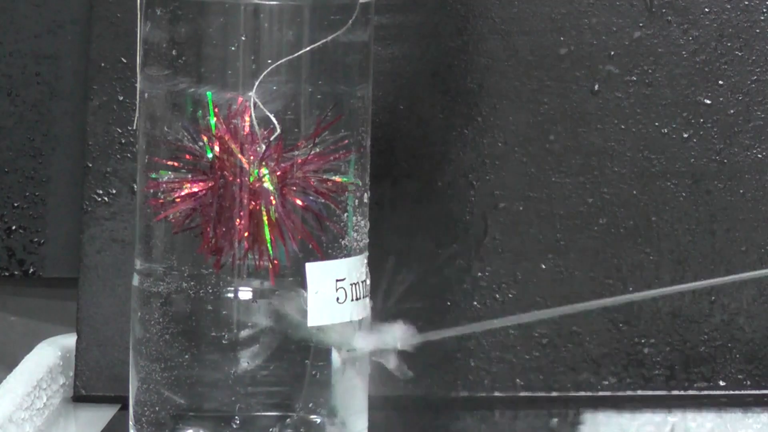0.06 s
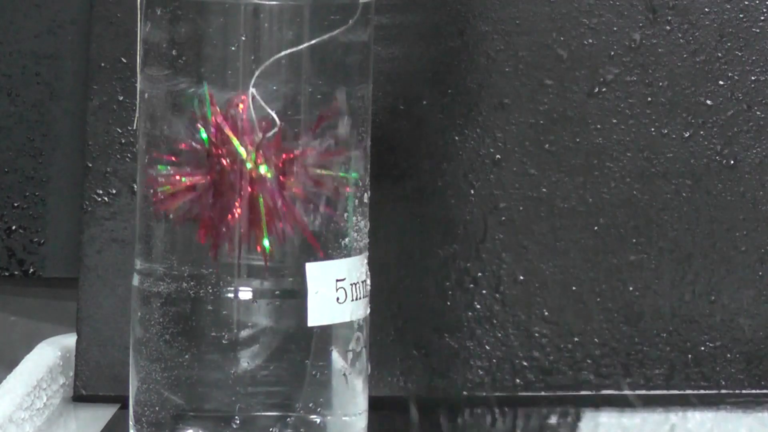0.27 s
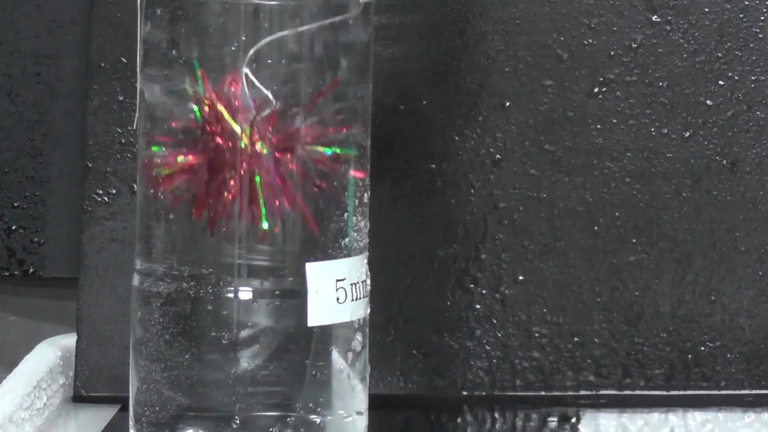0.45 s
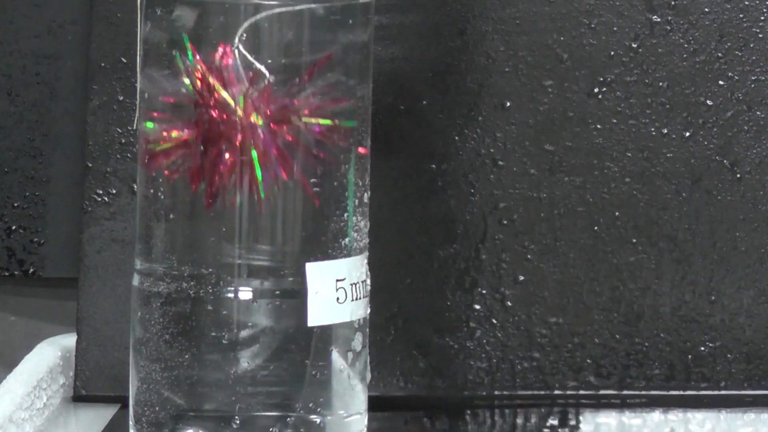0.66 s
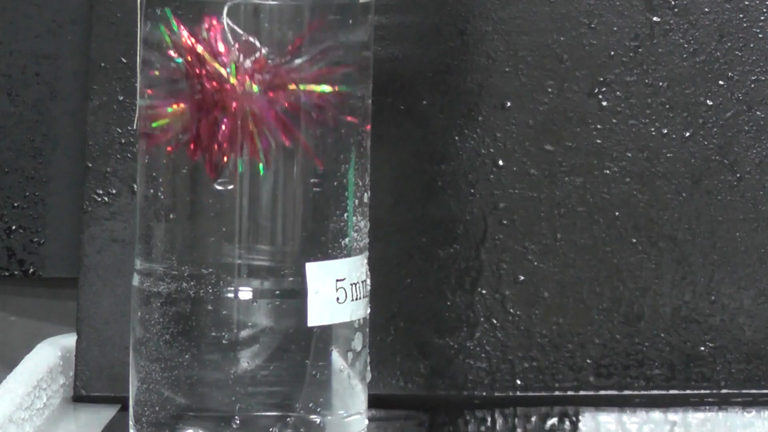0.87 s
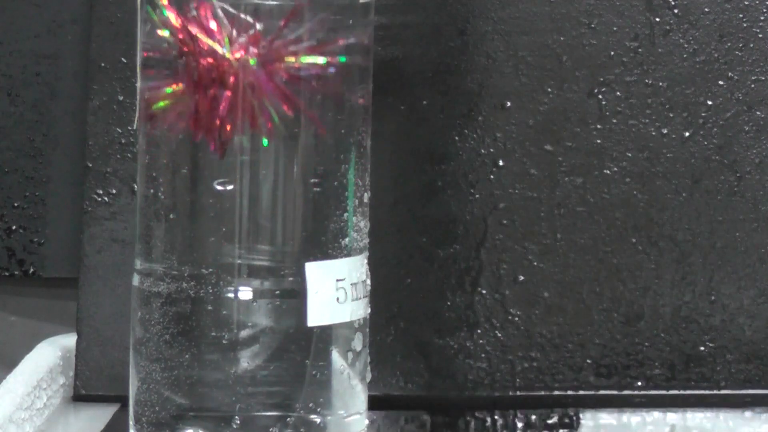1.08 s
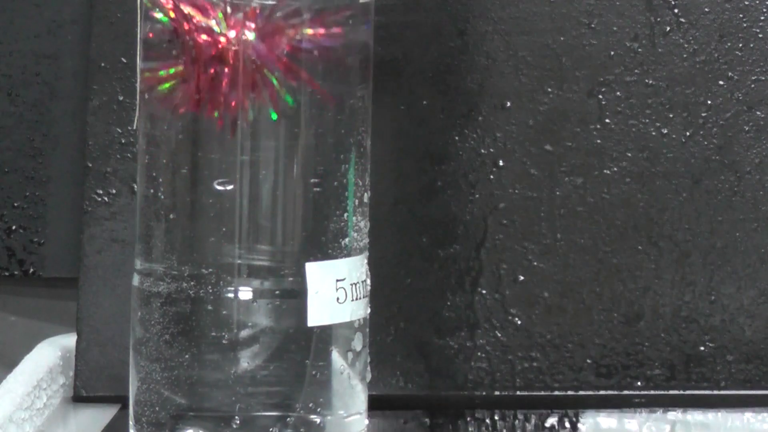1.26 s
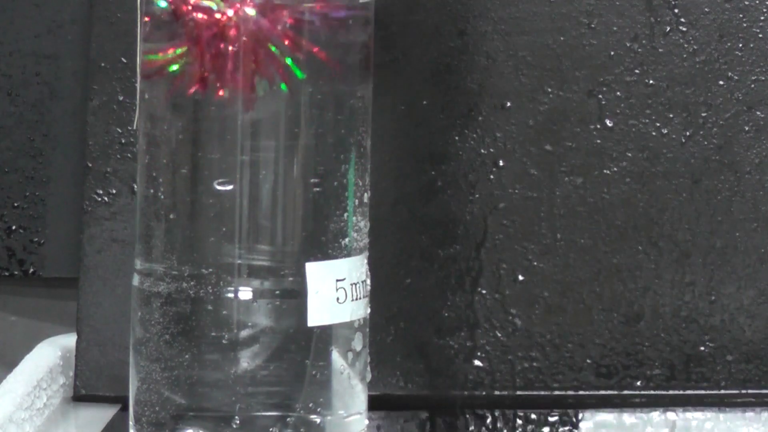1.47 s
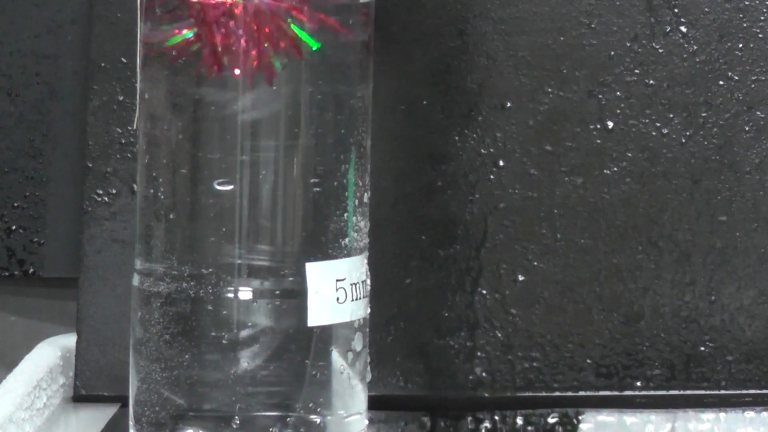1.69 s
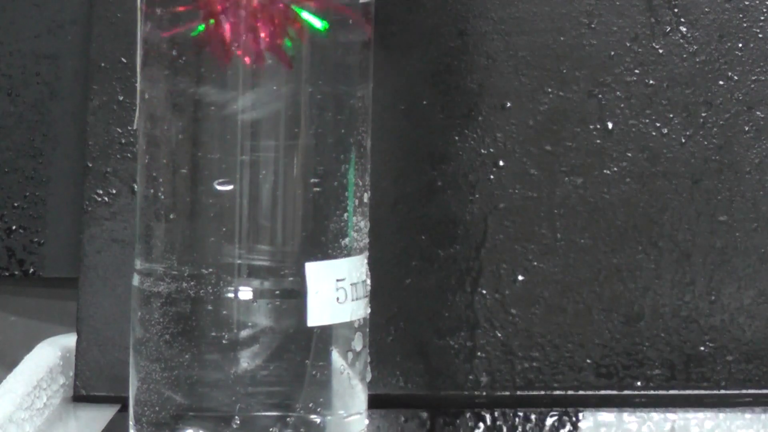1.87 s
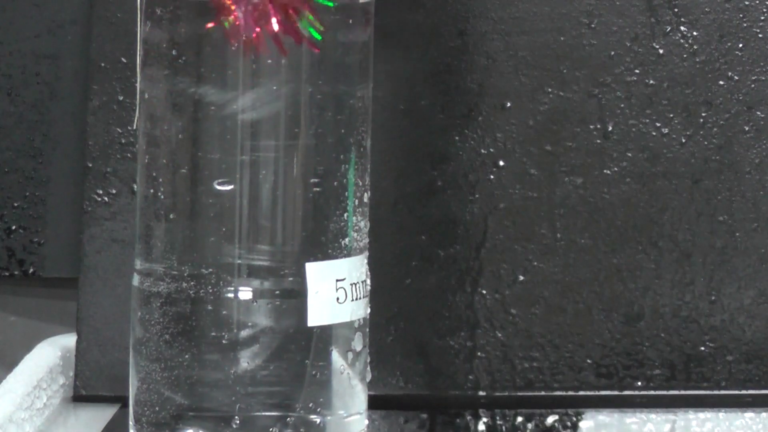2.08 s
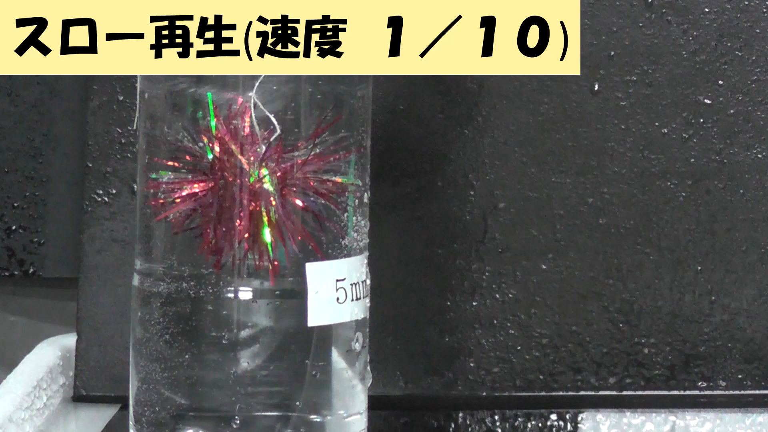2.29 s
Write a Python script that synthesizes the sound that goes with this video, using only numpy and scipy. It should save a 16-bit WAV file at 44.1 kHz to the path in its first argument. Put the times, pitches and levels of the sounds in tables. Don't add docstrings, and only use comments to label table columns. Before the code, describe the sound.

Bright, dense spray splatters on a plastic bottle with two dull wall thumps, fading within a third of a second. Afterwards only fan hum, thin whine, quick ticking, distant insect chirps and faint rustles remain, until an abrupt cut.

```python
import sys
import numpy as np
from scipy import signal
from scipy.io import wavfile

SR = 44100
rng = np.random.default_rng(int(sys.argv[2]) if len(sys.argv) > 2 else 0)


def gain_from_db(level_db):
    decades = np.asarray(level_db, float) / 20
    return 10 ** decades


def unload_audio(sound):
    columns = np.transpose(np.atleast_2d(sound))
    steps = np.round(np.clip(columns, -1, 1) * 32767)
    wavfile.write(sys.argv[1], SR, steps.astype(np.int16))


N = 103061

# f/Hz, density/dB per Hz
HUM_SPECTRUM = [(15, -52.5), (25, -16), (64, -17), (98, -9.5), (124, -13), (287, 0.5), (323, -10),
                (396, -6.5), (1400, -19.5), (1820, -55), (3080, -120)]
# f/Hz, density/dB per Hz
AIR_SPECTRUM = [(820, -32), (1400, 4.5), (2720, -10), (2950, -9), (4680, -14.5), (5670, -8.5), (7590, -14),
                (9560, -11), (15500, -16)]
# f/Hz, left-right likeness/1
BACKGROUND_ALIKE = [(60, 0.92), (180, 1), (550, 0.89), (1650, 0.92), (4970, 0.83), (15000, -0.56)]
# f/Hz, left minus right level/dB
BACKGROUND_PAN = [(60, -2.5), (240, -1.0), (950, 1), (3770, -0.5), (15000, 0.5)]
# f/Hz, width/Hz, level/dB
DRONES = [(98.5, 8.0, -54), (155, 25, -54), (199, 8.0, -53), (297, 16, -46.5), (398.6, 14, -48),
          (540, 12, -55)]
# f/Hz, level/dB, pan/dB
WHINES = [(1227.5, -63, -.5), (2062, -70, -.5), (2848, -63, -.5), (3829.5, -64.5, -.5), (4420, -74, -.5),
          (4468, -75, -.5), (5460, -73, -2)]
# t/s, level/dB, brightness/dB per octave
JET = [
    (.022, -27, 1.5),
    (.05, -27, -1.2),
    (.12, -24, 0.63),
    (.2, -26.5, -1.5),
    (.225, -33, -2.5),
    (.29, -46.5, -2.5),
    (.34, -57.5, -7),
    (.43, -74, -8),
]
# f/Hz, density/dB per Hz
SPLASH_SPECTRUM = [(820, -31), (1400, -10), (1530, 13), (1730, -9), (4500, -8), (5500, -3), (7820, -5.5),
                   (11600, -2), (15500, -17)]
# f/Hz, left-right likeness/1
SPLASH_ALIKE = [(200, 0.85), (1650, .85), (4000, 1), (6000, 0.87), (8500, .35), (10500, .3), (12500, 0.55),
                (15000, .3)]
# f/Hz, left minus right level/dB
SPLASH_PAN = [(240, -1.0), (950, 4), (3770, -1.2), (8000, 1), (10500, .3), (12500, -2.5), (15000, -5.5)]
# f/Hz, width/Hz, gain/dB
SIZZLES = [(8800, 420, 3), (11800, 1200, 3), (5020, 190, 2), (6300, 900, 2.5)]
# t/s, rattle level/dB, boom level/dB
PUSH = [
    (.02, -42, -55),
    (.05, -26.5, -33.5),
    (.09, -32.5, -29.5),
    (.113, -33, -43),
    (.132, -27.5, -29.5),
    (.178, -28, -26),
    (.2, -32, -53.5),
    (.24, -32.5, -41.5),
    (.34, -50.5, -55),
]
SURGES = (.045, .125)
# f/Hz, width/Hz, level/dB
WALL = [(501.4, 40, -3.5), (738, 65, -4), (970, 46, -1), (1244, 71, -1.5)]
# t/s, length/s, level/dB
CHIRPS = [(.472, .085, -65), (.592, .067, -66), (.695, 0.064, -64), (.783, .037, -63), (.875, 0.13, -66),
          (1.018, .09, -67), (1.14, .04, -68), (1.293, .026, -63), (1.327, .035, -64), (1.37, .045, -65),
          (1.48, 0.045, -69), (1.77, 0.058, -61), (1.84, 0.077, -64.5), (2.03, .17, -66),
          (2.21, .04, -62.5)]
# t/s, length/s, level/dB
TRILLS = [
    (1.517, .145, -61),
    (1.906, .072, -60.5),
]
# f/Hz, level/dB, t60/s
HOUSING = [(1744, 0.3, 0.028), (1970, -9, .02), (2135, -8.5, 0.03), (2384, -3, 0.027), (2990, -20, 0.011),
           (5000, -12.5, 0.015), (6330, -10.5, 0.013), (6620, -12, 0.011)]
# t/s, decay/s, level/dB, low f/Hz, high f/Hz
RUSTLES = [
    (1.125, 0.075, -52.5, 2950, 11600),
    (2.14, 0.061, -48.5, 1490, 6760),
]
# f/Hz, width/Hz, gain/dB
NOTCHES = [(7740, 630, -12), (4490, 270, -4), (1390, 380, -6)]

WAVER_DB = 1.6


def rms_one(x):
    return x / np.sqrt(np.mean(x ** 2) + 1e-20)


def at_hz(points, hz):
    points = np.array(points)
    return np.interp(np.log(hz), np.log(points[:, 0]), points[:, 1])


def in_time(rows, n):
    s, *columns = np.transpose(rows)
    return [np.interp(np.arange(n) / SR, s, c) for c in columns]


def drift(rate):
    r = np.exp(-80 * np.pi * rate / SR)
    slow = signal.lfilter([1], [1, -2 * r, r * r], rng.standard_normal(N // 40 + 2002))[2000:]
    return np.interp(np.arange(N) / 40, np.arange(len(slow)), rms_one(slow))


def tone(hz, wander_hz, rate):
    return np.sqrt(2) * np.sin(2 * np.pi * np.cumsum(hz + wander_hz * drift(rate)) / SR)


def band_pass(x, order, low_hz, high_hz):
    return signal.sosfilt(signal.butter(order, [low_hz, high_hz], "band", fs=SR, output="sos"), x)


def resonance(x, hz, width_hz):
    r = np.exp(-np.pi * width_hz / SR)
    top = np.array([1, 0, -1]) * (1 - r * r) / 2
    return signal.lfilter(top, [1, -2 * r * np.cos(2 * np.pi * hz / SR), r * r], x)


def steep_resonance(x, hz, width_hz):
    return resonance(resonance(x, hz, width_hz), hz, width_hz)


def panned(x, db):
    return x * gain_from_db(np.array([[db / 2], [-db / 2]]))


def gate(start, length, edge):
    t = np.arange(N) / SR
    return np.clip(np.minimum(t - start, start + length - t) / edge, 0, 1)


def grains(rate, spread_db, size):
    big = gain_from_db(spread_db * np.minimum(rng.exponential(1, size), 5)) * rng.choice([-1, 1], size)
    return rms_one(big * (rng.random(size) < rate / SR))


def banded(white, spectrum, span, alikes, pans, patchy_db, tilt_db=0):
    n, out, power, together = white.shape[-1], 0, 0, drift(3.5)
    edges = np.geomspace(*span, int(4 * np.log2(span[1] / span[0])) + 2)
    for k, (low, high) in enumerate(zip(edges, edges[1:])):
        mid, side = band_pass(np.tile(white[k % 2], 2), 2, low, high)[:, n:]
        hz = np.sqrt(low * high)
        level_db = at_hz(spectrum, hz)
        alike = np.clip(at_hz(alikes, hz), -1, 1)
        flicker_db = patchy_db * (.5 * together + drift(11.7))[:n]
        gain = gain_from_db(level_db + flicker_db + tilt_db * np.log2(hz / 8000))
        stereo = np.sqrt(1 + alike) * mid + np.sqrt(1 - alike) * side * [[1], [-1]]
        out = out + gain * panned(stereo, at_hz(pans, hz))
        power += gain_from_db(level_db) ** 2 * (high - low) / SR * 2
    return out / np.sqrt(2 * power)


def background():
    hum_noise, air_noise = rng.standard_normal((2, 2, 2, N))
    hum = gain_from_db(-37) * banded(hum_noise, HUM_SPECTRUM, (20, 1400), BACKGROUND_ALIKE, BACKGROUND_PAN, 0.5)
    air = gain_from_db(-51) * banded(air_noise, AIR_SPECTRUM, (1400, 16500), BACKGROUND_ALIKE, BACKGROUND_PAN, 1.14)
    drones = 0
    for hz, width_hz, db in DRONES:
        ringing = steep_resonance(rng.standard_normal(N + SR), hz, width_hz)[SR:]
        drones = drones + gain_from_db(db) * rms_one(ringing)
    whines = 0
    for hz, db, pan_db in WHINES:
        whines = whines + panned(gain_from_db(db + WAVER_DB * drift(20)) * tone(hz, 4.0, 9.7), pan_db)
    return hum + air + panned(drones, -.9) + whines


def splash(n):
    drops_per_s, drop_spread_db, drop_share = 12000, 2.5, .5
    db, tilt_db = in_time(JET, n)
    drops = grains(drops_per_s, drop_spread_db, size=(2, 2, n))
    white = np.sqrt(drop_share) * drops + np.sqrt(1 - drop_share) * rng.standard_normal((2, 2, n))
    spray = banded(white, SPLASH_SPECTRUM, (1300, 16500), SPLASH_ALIKE, SPLASH_PAN, .6, tilt_db)
    spray = gain_from_db(db) * spray
    for hz, width_hz, gain_db in SIZZLES:
        spray = spray + (gain_from_db(gain_db) - 1) * resonance(spray, hz, width_hz)
    return spray


def bottle_wall(n):
    boom_hz, sag_hz_per_s, wander_hz = 308, -550, 8
    wall_db, boom_db = in_time(PUSH, n)
    slugs = grains(1300, 1.5, size=n)
    rings = 0
    for k, (hz, width_hz, db) in enumerate(WALL):
        rings = rings + (-1) ** k * gain_from_db(db) * resonance(slugs, hz, width_hz)
    bed = rms_one(band_pass(rng.standard_normal((2, n)), 2, 150, 1230))
    rattle = rms_one(rings) + gain_from_db(-5) * bed
    t = np.arange(N) / SR
    since_surge = t - np.where(t < SURGES[1] - .015, *SURGES)
    body = tone(boom_hz + sag_hz_per_s * np.clip(since_surge, 0, .07), wander_hz, 20)[:n]
    thud = gain_from_db(-8) * rms_one(steep_resonance(slugs, 175, 60))
    return gain_from_db(boom_db) * (body + thud) + gain_from_db(wall_db) * rattle


def jet():
    n = SR // 2
    arrived = gate(0.021, 0.49, 0.0005)[:n]
    nozzle = gain_from_db(-17.5) * gate(0, .03, 0.002)[:n]
    wall_fade = gate(-0.98, 1.434, .06)[:n]
    out = np.zeros((2, N))
    out[:, :n] = splash(n) * (arrived + nozzle) + arrived * wall_fade * bottle_wall(n)
    return out


def room(x):
    t60_s, thin_hz, dull_hz = 0.42, 500, 6500
    t = np.arange(SR // 2) / SR
    b, a = signal.butter(1, [thin_hz, dull_hz], "band", fs=SR)
    tail = signal.lfilter(b, a, rng.standard_normal((2, len(t))))
    tail = tail * gain_from_db(-60 * t / t60_s) * (t > .006)
    tail = tail / np.sqrt(np.sum(tail ** 2) / 2)
    return gain_from_db(-16.5) * signal.fftconvolve(x, tail, axes=1)[:, :N]


def crickets():
    chirp_hz, trill_hz, trill_width_hz, pulses_per_s = 5460, 8730, 600, 168
    thin = gain_from_db(WAVER_DB * drift(25)) * tone(chirp_hz, 8, 34)
    teeth = np.cumsum(pulses_per_s * (1 + .025 * drift(60))) / SR
    pulses = np.diff(np.floor(teeth), prepend=0) * gain_from_db(1.5 * rng.standard_normal(N))
    pulses = pulses + 0.045 * rng.standard_normal(N)
    buzz = rms_one(steep_resonance(pulses, trill_hz, trill_width_hz))
    chirps = thin * sum(gain_from_db(db) * gate(s, length, 0.0078) for s, length, db in CHIRPS)
    trills = buzz * sum(gain_from_db(db) * gate(s, length, 0.011) for s, length, db in TRILLS)
    return panned(chirps, -3) + panned(trills, -3)


def lens_motor():
    start_s, first_s, last_s, frame_s = .9316, .9472, 2.09, 1001 / 30000
    tick_db, weak_db, spread_db = -41, -4.5, 1.5
    s = np.arange(first_s, last_s, frame_s)
    db = np.r_[0, weak_db * (np.arange(len(s)) % 2)]
    s, out = np.r_[start_s, s], 0
    for hz, level_db, t60 in HOUSING:
        clicks = np.full(N, 1e-18)
        uneven_db = spread_db * rng.standard_normal(len(s))
        clicks[(s * SR).astype(int)] = gain_from_db(tick_db + level_db + db + uneven_db)
        r, w = gain_from_db(-60 / (t60 * SR)), 2 * np.pi * hz / SR
        out = out + signal.lfilter([0, np.sin(w)], [1, -2 * r * np.cos(w), r * r], clicks)
    return out


def rustles():
    t, out = np.arange(N) / SR, 0
    for s, decay, db, low_hz, high_hz in RUSTLES:
        puff = rms_one(band_pass(grains(8200, 3.2, size=N), 4, low_hz, high_hz))
        out = out + gain_from_db(db) * puff * gate(s, .3, .006) * np.exp(-np.abs(t - s) / decay)
    return out


def scene():
    spray = jet()
    return background() + spray + room(spray) + crickets() + lens_motor() + rustles()


def low_pass(x):
    return signal.sosfilt(signal.butter(12, 16480, fs=SR, output="sos"), x)


def record(dry):
    cut_s, fall_s, after_db, after_t60_s = 2.2395, .001, -32, 0.081
    x = signal.sosfilt(signal.ellip(12, .3, 70, 15790, fs=SR, output="sos"), dry)
    for hz, width_hz, db in NOTCHES:
        x = x - (1 - gain_from_db(db)) * resonance(x, hz, width_hz)
    since_cut = np.arange(N) / SR - cut_s
    dull = signal.sosfilt(signal.butter(4, 1990, fs=SR, output="sos"), x)
    remnant = dull * (since_cut > 0) * gain_from_db(after_db - 60 * np.maximum(since_cut, 0) / after_t60_s)
    mix = x * np.clip(1 - since_cut / fall_s, 0, 1) + remnant
    return low_pass(mix)


dry = scene()
out = record(dry)
unload_audio(out)
```